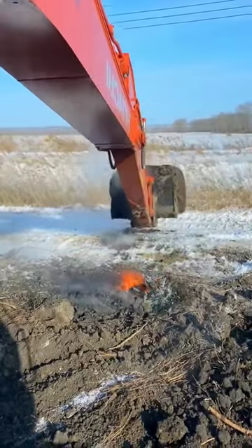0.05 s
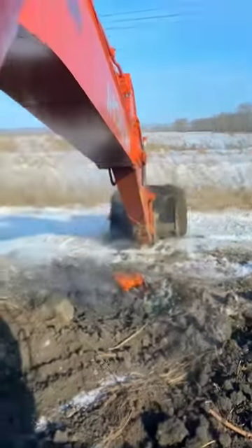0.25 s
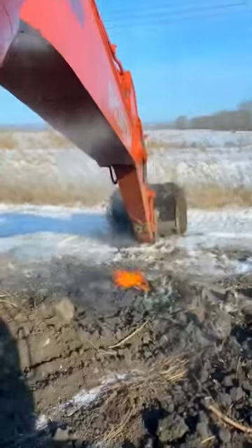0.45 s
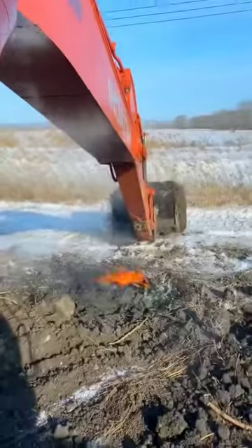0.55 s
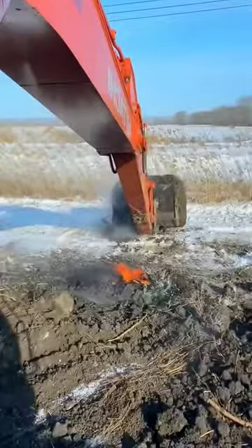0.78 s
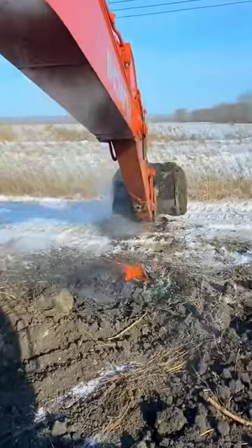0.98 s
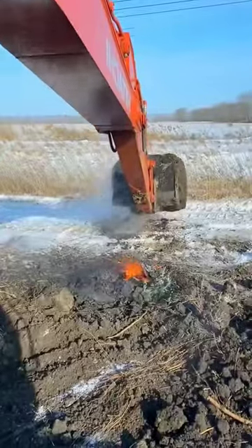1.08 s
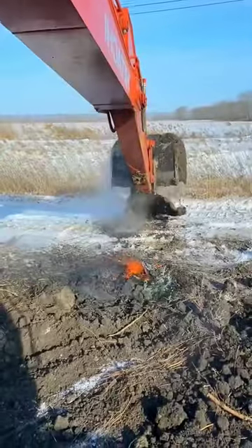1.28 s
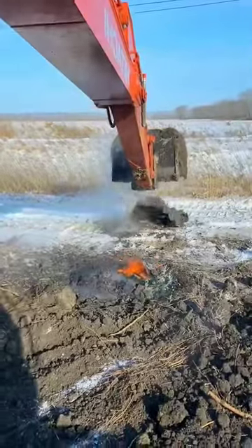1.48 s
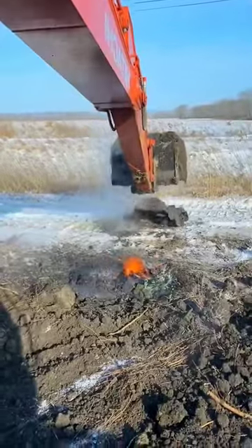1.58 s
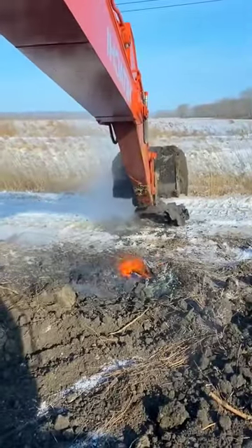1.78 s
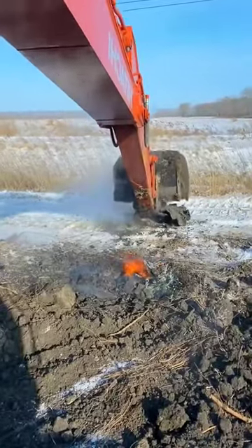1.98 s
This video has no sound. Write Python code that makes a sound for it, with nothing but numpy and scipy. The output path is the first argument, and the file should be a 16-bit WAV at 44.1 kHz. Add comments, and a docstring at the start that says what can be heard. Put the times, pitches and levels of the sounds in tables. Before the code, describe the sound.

A heavy bang and metallic rattle ring out as an excavator bucket hits frozen soil in an open field. Loose dirt then clatters down with a deep thud, over low engine rumble and a little wind on the microphone.

```python
"""Excavator on frozen ground

An open field, the microphone within earshot of the dig. The bucket slams into frozen ground:
the ground booms, and bucket and arm ring and rattle. As the bucket lifts, frozen dirt slides off,
clicks and chinks on the steel, and a big clod drops back. The engine rumbles underneath,
a small ground fire crackles and a little wind touches the microphone."""
import sys
import numpy as np
from scipy import signal
from scipy.fft import rfft, irfft
from scipy.io import wavfile
from scipy.ndimage import uniform_filter1d

SR = 44100
rng = np.random.default_rng(int(sys.argv[2]) if len(sys.argv) > 2 else 0)


def wav_out(sig):
    """Save sig, one row per channel (or a flat mono array), as 16-bit PCM at SR to the path in sys.argv[1]."""
    wavfile.write(sys.argv[1], SR, np.round(np.clip(np.atleast_2d(sig).T, -1, 1) * 32767).astype(np.int16))


N = 90404
STRIKE_S = 0.2202  # the bucket meets the ground
TOP_HZ = 15700  # upper edge of the grit and of the recorder


def undb(db):
    """Decibels to gain."""
    return 10 ** (np.asarray(db) / 20)


def unit(x):
    """Scale to rms 1."""
    return x / np.sqrt(np.mean(x ** 2) + 1e-18)


def since(start):
    """Seconds after a moment, zero before it."""
    return np.maximum(np.arange(N) / SR - start, 0)


def curve(points):
    """Gain along (s, dB) points."""
    return undb(np.interp(since(0), *np.array(points).T))


def fade(age, t60):
    """Exponential decay, 60 dB down after t60 seconds."""
    return np.exp(-np.log(1000) * age / max(t60, 1e-3))


def strike(start, attack, t60):
    """Quick rise and exponential decay; all times in seconds."""
    age = since(start)
    return (1 - np.exp(-age / max(attack, 1e-5))) * fade(age, t60)


def bin_hz():
    """Frequency of every spectral bin, at least 1 Hz."""
    return np.maximum(np.arange(N // 2 + 1) * SR / N, 1)


def shape(x, gain):
    """Filter by a gain per bin; rms 1."""
    return unit(irfft(rfft(x) * gain, N))


def colour(x, points):
    """Filter through (Hz, dB) points; rms 1."""
    hz, db = np.array(points).T
    return shape(x, undb(np.interp(np.log2(bin_hz()), np.log2(hz), db)))


def noise():
    """Two unrelated noises: mid and side."""
    return rng.standard_normal((2, N))


def resonance(hz, width_hz):
    """Mid and side noise through one resonance."""
    return shape(noise(), 1 / (1 + ((bin_hz() - hz) / width_hz) ** 2))


def noise_band(hz, octaves, slope=2):
    """Mid and side noise, 6 dB down this many octaves either side of hz."""
    return shape(noise(), 1 / (1 + (np.log2(bin_hz() / hz) / octaves) ** slope))


def grains(per_s, spread_db):
    """Random clicks of uneven size: mid and side."""
    clicks = (rng.random((2, N)) < per_s / SR) * np.sign(noise())
    sizes = undb(spread_db * np.minimum(rng.exponential(size=(2, N)), 4))
    return unit(clicks * sizes)


def stereo(pair, side_db):
    """Mid and side to left and right."""
    return pair[0] + undb(side_db) * pair[1] * np.array([[1], [-1]])


def walk(hz):
    """Random wander slower than about hz; rms 1."""
    return shape(rng.standard_normal(N), np.exp(-(bin_hz() / hz) ** 2))


def steady(x, seconds):
    """Even out the slow swells of a noise."""
    power = uniform_filter1d(x ** 2, max(int(seconds * SR), 2), axis=-1)
    return x / np.sqrt(power + 1e-6)


# Colour of the engine at the microphone. Each row: frequency in Hz, relative level in dB.
RUMBLE_COLOUR = [(18, -59), (35, -2.5), (62, -2), (100, -7), (160, -10.5), (300, -19.5), (600, -25.5),
                 (1200, -38.5), (2500, -73), (16000, -87)]
# The engine taking up the load. Each row: time in seconds, gain in dB.
ENGINE_LOAD = [(0, -3), (.2, -2.5), (.9, 1.5), (1.12, -3.5), (1.3, -0.5), (1.5, -0.5), (1.8, 2),
               (2.05, 0.5)]


def engine():
    """The engine, low and central: a rumble and an unsteady firing note that swell with the load."""
    firing_hz = 55.5 * (1 + 0.039 * walk(5.0))
    firing = np.sin(2 * np.pi * np.cumsum(firing_hz) / SR) * undb(-41.5 + 2 * walk(8.9))
    rumble = steady(colour(rng.standard_normal(N), RUMBLE_COLOUR), 0.14) * undb(-34.5)
    return (firing + rumble) * curve(ENGINE_LOAD)


# A light gust across the field. Each row: time in seconds, level in dB.
WIND_LEVEL = [(0, -55), (.3, -68), (1.0, -33), (1.45, -47), (1.6, -51), (2.05, -109)]


def wind():
    """Wind right on the microphone ports makes a low, wide flutter."""
    return resonance(hz=0, width_hz=135) * curve(WIND_LEVEL)


# Colour of the ground fire. Each row: frequency in Hz, relative level in dB.
FIRE_COLOUR = [(300, -5), (1500, -1), (5000, 1), (8000, 0.5), (11000, -11.5), (16000, -20)]
# Rise and fall of the fire. Each row: time in seconds, gain in dB.
FIRE_SWELL = [(0, 1.5), (1.02, 3), (1.1, 0), (1.65, 3), (2.05, 1.5)]


def fire():
    """A small ground fire, faint at the microphone: pops over an even hiss."""
    pops = colour(grains(per_s=220, spread_db=2.4)[0], FIRE_COLOUR) * undb(-54)
    hiss = colour(rng.standard_normal(N), FIRE_COLOUR) * undb(-55)
    return (pops + hiss) * curve(FIRE_SWELL)


def grit(per_s=6000, longest_t60_s=.014, spread_db=3.3):
    """Tiny frozen crumbs, each ticking briefly at its own pitch: mid and side."""
    out = np.zeros((2, N))
    age = np.arange(int(longest_t60_s * SR)) / SR
    for when, pitch, size, length, side in rng.random((int(per_s * N / SR), 5)):
        at = int(when * (N - len(age)))
        tick = np.sin(2 * np.pi * pitch * TOP_HZ * age) * fade(age, longest_t60_s * length)
        gain = undb(-spread_db * np.log(size + .01))
        out[:, at:at + len(age)] += np.outer([1, 2 * side - 1], tick * gain)
    return out


# Dirt leaving the lifted bucket. Each row: time in seconds, level in dB.
SLIDE_LEVEL = [(1.141, -62), (1.158, -39), (1.2, -42.5), (1.26, -42), (1.31, -44.5), (1.413, -33),
               (1.462, -47.5), (1.529, -37.5), (1.6, -52.5), (1.68, -67)]
# Colour of that dirt. Each row: frequency in Hz, relative level in dB.
SLIDE_COLOUR = [(200, -2), (600, -5.5), (1200, -0.5), (2500, 1), (4500, -2), (7000, 1), (10000, -5.5),
                (15500, -15)]


def sliding_dirt():
    """Grit and dry, crackling dust slide off the steel in an uneven stream."""
    times, db = np.array(SLIDE_LEVEL).T
    flow = undb(np.interp(since(0), times, db, left=-120, right=-120) + 2 * walk(39))
    crumbs = unit(grit())
    dust = undb(-2) * grains(per_s=4000, spread_db=3.5)
    return flow * stereo(colour(crumbs + dust, SLIDE_COLOUR), side_db=0)


# Hard crumbs around the bucket. Each row: start in seconds, level in dB, centre in Hz, t60 in seconds.
CRACKS = [(.033, -27.5, 1890, 0.012), (0.07, -32.5, 2030, 0.021), (0.135, -37, 3440, 0.0076),
          (.156, -33.5, 3430, 0.021), (0.221, -21, 11000, 0.0096), (.561, -38, 11000, 0.023),
          (.668, -39, 12500, 0.037), (0.833, -30, 13000, 0.013), (0.862, -36, 6200, 0.042),
          (0.954, -34, 2130, 0.013), (1.072, -30.5, 2330, 0.034), (1.15, -28, 6500, 0.014),
          (1.157, -20.5, 2040, 0.013), (1.166, -39, 6960, 0.018), (1.1974, -26.5, 6440, 0.013),
          (1.253, -32, 7800, 0.091), (1.254, -21, 3750, 0.016), (1.341, -29, 6260, 0.033),
          (1.379, -35, 2760, 0.027), (1.397, -31, 7000, 0.069), (1.4116, -22, 5600, 0.02),
          (1.4137, -13.5, 3360, 0.0088), (1.498, -28.5, 4300, 0.038), (1.502, -23.5, 4330, 0.023),
          (1.522, -38, 5500, 0.04), (1.5389, -15.5, 2880, 0.0049), (1.6503, -29.5, 3350, 0.011),
          (1.747, -34, 3780, 0.0082), (1.79, -36.5, 4840, 0.017), (1.8738, -34, 3130, 0.0075),
          (1.909, -37, 2000, 0.0075)]


def cracking_crumbs():
    """Hard crumbs crack and land, each a sharp, broad burst of noise."""
    out = 0
    for start, db, hz, t60 in CRACKS:
        crack = stereo(noise_band(hz, octaves=0.77), side_db=-15)
        out = out + undb(db) * strike(start, 0.0003, t60) * crack
    return out


# Frozen lumps colliding. Each row: start in seconds, level in dB, pitch in Hz, t60 in seconds.
CHINKS = [(1.151, -25, 6550, 0.02), (1.205, -33.5, 4600, 0.038), (1.222, -32, 5360, 0.09),
          (1.23, -37, 2710, 0.034), (1.258, -27, 5600, 0.083), (1.292, -28.5, 5230, 0.043),
          (1.327, -30, 6650, 0.033), (1.3695, -18, 8550, 0.024), (1.369, -19, 5430, 0.018),
          (1.381, -25.5, 7300, 0.024), (1.411, -32, 7050, 0.2), (1.565, -48, 11600, .07)]


def chinking_lumps():
    """Frozen lumps ring in a narrow band as they knock together."""
    out = 0
    for start, db, hz, t60 in CHINKS:
        tone = steady(resonance(hz, width_hz=0.04 * hz), 0.0033)
        out = out + undb(db) * strike(start, 0.00084, t60) * stereo(tone, side_db=-4)
    return out


# Soft clods landing. Each row: start in seconds, level in dB, centre in Hz, t60 in seconds.
KNOCKS = [(.068, -31.5, 715, 0.019), (1.072, -33, 900, 0.03), (1.292, -38, 610, 0.18),
          (1.3224, -28.5, 760, 0.06), (1.397, -31, 520, 0.04), (1.5, -32, 1200, 0.051)]


def soft_clods():
    """Soft lumps knock dully on steel and soil."""
    out = 0
    for start, db, hz, t60 in KNOCKS:
        body = steady(noise_band(hz, octaves=0.5), 0.013)
        out = out + undb(db) * strike(start, 0.00077, t60) * stereo(body, side_db=-11.5)
    return out


def big_clod(start=1.526, hz=44.5):
    """A big clod drops back to the ground with one deep thud."""
    return undb(-18.5) * strike(start, attack=0.0044, t60=0.3) * np.sin(2 * np.pi * hz * since(start))


# Clinks from the arm's linkage. Each row: start in seconds, level in dB.
PIN_CLINKS = [(.561, -35), (0.708, -44.5)]
# Modes of the pins. Each row: frequency in Hz, level relative to the clink in dB, t60 in seconds.
PIN_MODES = [(5320, -1, .45), (6900, -2, .08), (7710, -4, .26), (9470, -1.5, .22), (13500, -15, .15)]


def pins():
    """Loose pins jangle in the linkage, with a fine rattle on top."""
    jangle = 0
    for hz, db, t60 in PIN_MODES:
        level = sum(undb(hit_db + db) * strike(start, 0.00064, t60) for start, hit_db in PIN_CLINKS)
        tone = steady(resonance(hz, width_hz=40), 0.0067)
        jangle = jangle + level * stereo(tone, side_db=1)
    rattle_level = sum(undb(db - 12) * strike(start, attack=.001, t60=.5) for start, db in PIN_CLINKS)
    return jangle + rattle_level * stereo(resonance(hz=12600, width_hz=670), side_db=-8)


# The bucket's blows into the ground. Each row: start in seconds, level in dB.
BLOWS = [(.221, -0.5), (.2315, 4), (.244, -7.5), (.276, -6), (.291, -6)]
# Modes of the ground. Each row: frequency in Hz, level relative to the blow in dB, t60 in seconds.
GROUND_MODES = [(80, -21, .16), (140, -5, .09), (215, -10, .06), (365, -8, .06)]


def ground_boom():
    """Every blow rings the same low modes of the frozen ground."""
    out = 0
    for start, blow_db in BLOWS:
        age = since(start)
        for hz, db, t60 in GROUND_MODES:
            out = out - undb(blow_db + db) * np.sin(2 * np.pi * hz * age) * fade(age, t60)
    return out


def bucket_slap():
    """The flat back of the bucket slaps the soil dully."""
    body = steady(noise_band(hz=207, octaves=1, slope=4), 0.032)
    return undb(-10.5) * strike(STRIKE_S, attack=0.012, t60=0.25) * stereo(body, side_db=-4)


# Modes of the bucket. Each row: frequency in Hz, level in dB, t60 in seconds until the arm rests.
BUCKET_MODES = [(260, -29, 1.7), (436, -27, 1.4), (495, -23, 1.5), (646, -28, 1.6), (732, -28, 1.5),
                (776, -30.5, 1.9), (1104, -30, .9), (1372, -37, 1.8), (4402, -27.5, 1.1), (4556, -28, .8),
                (4995, -31.5, 1.1), (5292, -32.5, 1.0), (5679, -27, 1.2), (6175, -33.5, .9)]


def bucket_ring(waver_db=2, waver_hz=3):
    """Clear steel modes, wavering as the bucket grinds in."""
    out = 0
    for hz, db, t60 in BUCKET_MODES:
        phase = 2 * np.pi * (np.cumsum(hz + waver_hz * walk(29)) / SR + rng.random())
        level = undb(db + waver_db * walk(8.4)) * strike(STRIKE_S, .025, t60)
        out = out + level * np.sin(phase)
    return out


# Clusters of close modes in the steel plates. Each row: centre in Hz, width in Hz.
PLATE_CLUSTERS = [(700, 110), (1150, 110), (1420, 70), (4030, 70), (4490, 130), (5070, 130), (5480, 90),
                  (5700, 90), (6170, 150), (6750, 70), (7730, 90)]


def plates(lift_db=6.5):
    """Gain per bin with which the steel plates colour the crash."""
    clusters = sum(np.exp(-((bin_hz() - hz) / width) ** 2) for hz, width in PLATE_CLUSTERS)
    return undb(lift_db * clusters)


# The crash of ground and steel at the microphone. Each row: frequency in Hz, band level in dB,
# attack in seconds, t60 in seconds until the arm rests, gain of the first burst in dB, side level in dB.
CRASH_BANDS = [(25, -26, 0.018, 1.8, -21, -11), (46.7, -13.5, 0.0059, 1.63, -3.5, -13),
               (95, -9, 0.022, 1.71, -2, -10), (182, -18, 0.0079, 2.26, -2, -3.5),
               (354, -21, 0.0037, 1.7, 5, -1.5), (565, -11, 0.0098, 1.06, -10.5, -9.5),
               (897, -25, 0.02, 2.06, -3, -6), (1190, -23, 0.029, 2.46, 4.5, 1.5),
               (2040, -24.5, 0.014, 2.23, 2.5, -8), (3400, -23.5, 0.031, 2.28, 2, -6),
               (4830, -16, 0.042, 1.02, -0.5, -59), (7300, -28, 0.044, 1.74, 9.5, -9),
               (9160, -35.5, 0.025, 1.53, 11.5, -10.5), (15100, -47, 0.036, 1.1, 16.5, -31)]


def crash(burst_s=0.15, graze_lead_s=0.0095, flicker_db=0.9):
    """Ground and steel shake and ring down: the lows come first, the crushed crust a moment later."""
    hz, *columns = np.array(CRASH_BANDS).T
    bin_octaves = np.log2(bin_hz())
    spectrum = rfft(noise() + 0.36 * grains(per_s=900, spread_db=2)) * plates()
    age = since(STRIKE_S)
    flicker = undb(flicker_db * walk(84))
    # The teeth graze the crust just before the blow.
    graze = undb(-11.5) * strike(STRIKE_S - graze_lead_s, attack=0.0031, t60=0.18)
    out = 0
    for centre in np.arange(np.log2(25), np.log2(18000), .5):  # half-octave bands
        db, attack, t60, burst_db, side_db = (np.interp(centre, np.log2(hz), c) for c in columns)
        window = np.clip(1.5 - 4 * abs(bin_octaves - centre), 0, 1)
        band = steady(unit(irfft(spectrum * window, N)), .07)
        burst = undb(burst_db * np.exp(-(age / burst_s) ** 2))
        level = np.minimum(age / attack, 1) * fade(age, t60) * burst + graze
        out = out + stereo(band, side_db) * level * undb(db) / np.sqrt(2)
    return out * flicker


def scene(rest_s=.76, settle_db_per_s=48.5):
    """The blow and the falling dirt, a touch left of centre, over engine, wind and fire."""
    settle = undb(-settle_db_per_s * since(rest_s))  # the shaking dies faster once the arm rests
    shaking = (crash() + bucket_ring()) * settle
    blow = shaking + bucket_slap() + ground_boom() + pins()
    dirt = cracking_crumbs() + chinking_lumps() + sliding_dirt() + big_clod() + soft_clods()
    balance = undb([[.25], [-.25]])
    return (blow + dirt) * balance + engine() + wind() + fire()


def record(dry):
    """The recorder rounds off the loudest peaks and cuts the top."""
    driven = 0.97 * dry
    rounded = driven / (1 + driven ** 6) ** (1 / 6)
    lowpass = signal.ellip(10, .2, 80, TOP_HZ, fs=SR, output="sos")
    return signal.sosfilt(lowpass, rounded)


dry = scene()
out = record(dry)
wav_out(out)
```